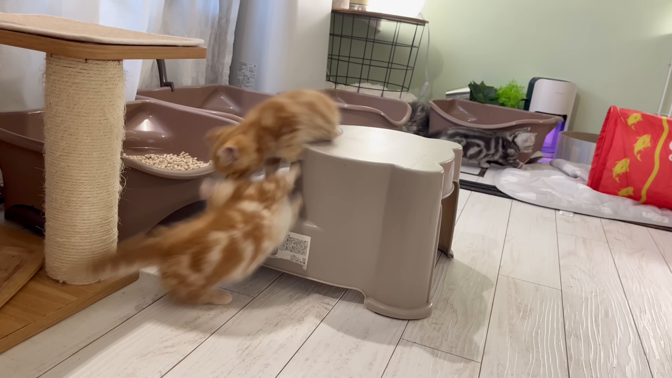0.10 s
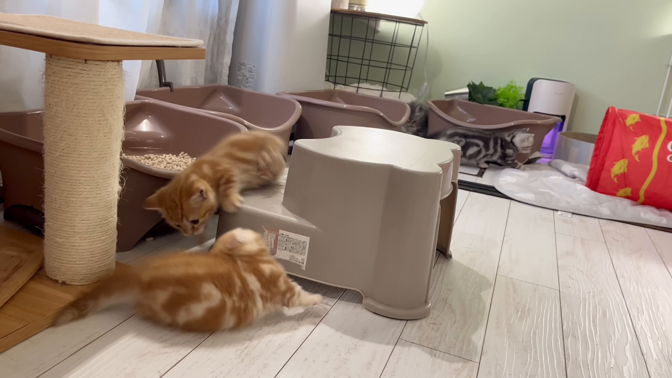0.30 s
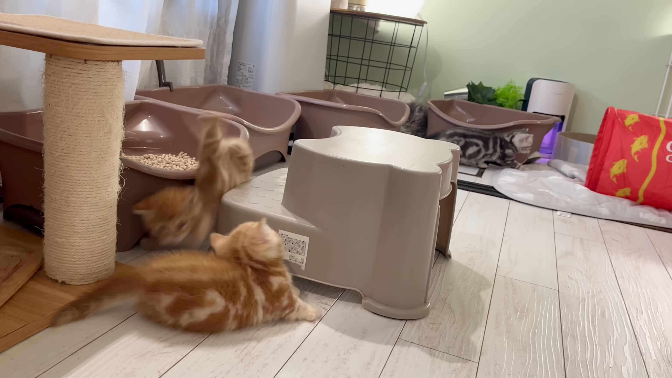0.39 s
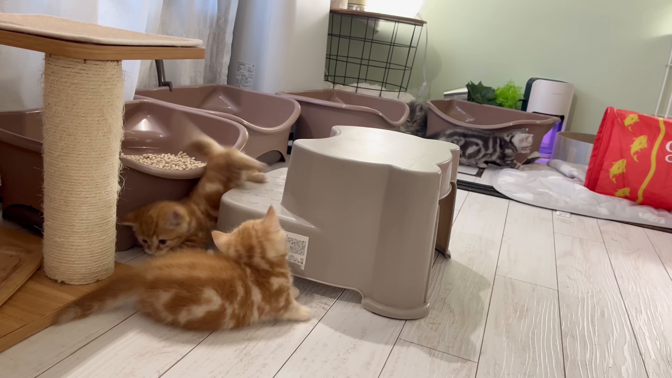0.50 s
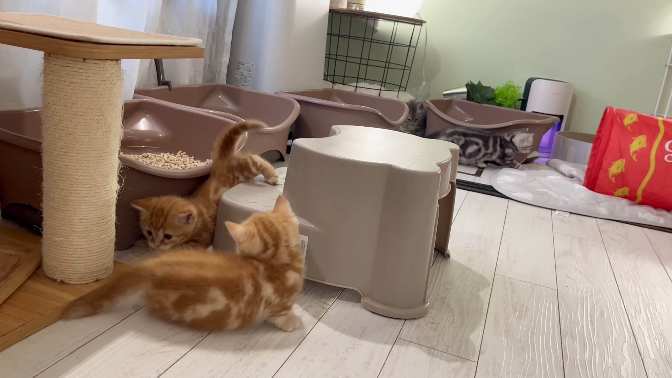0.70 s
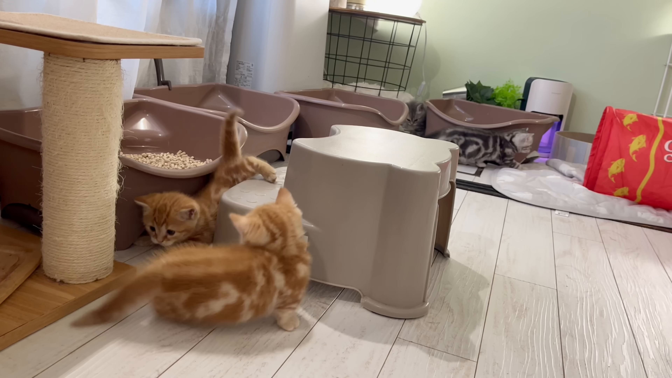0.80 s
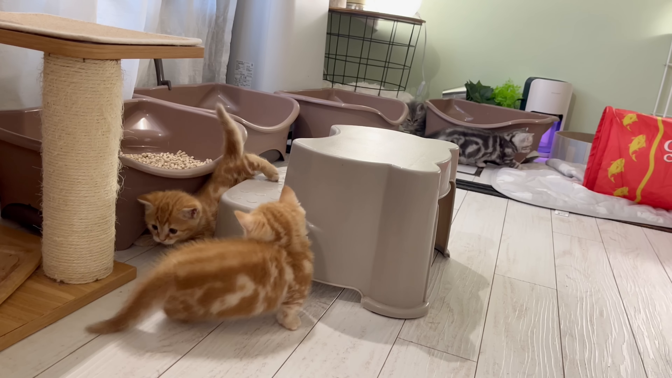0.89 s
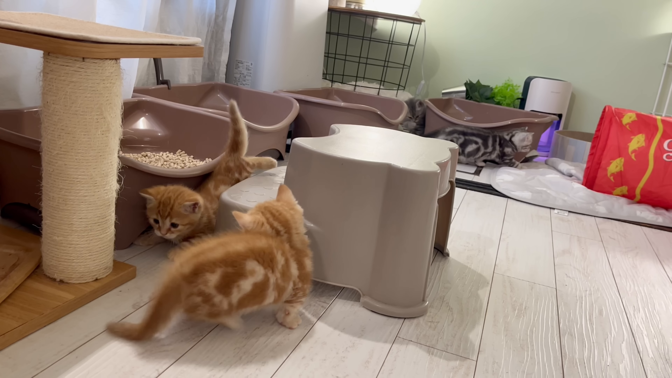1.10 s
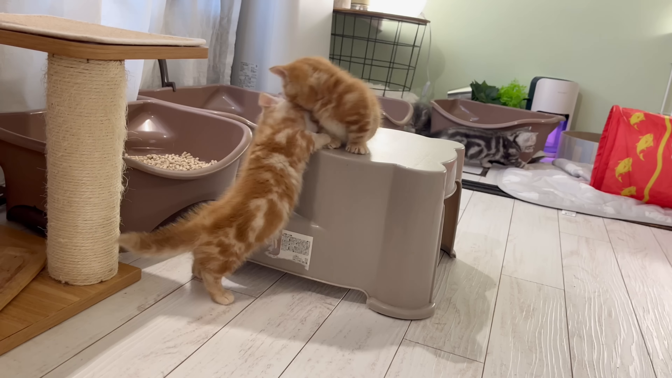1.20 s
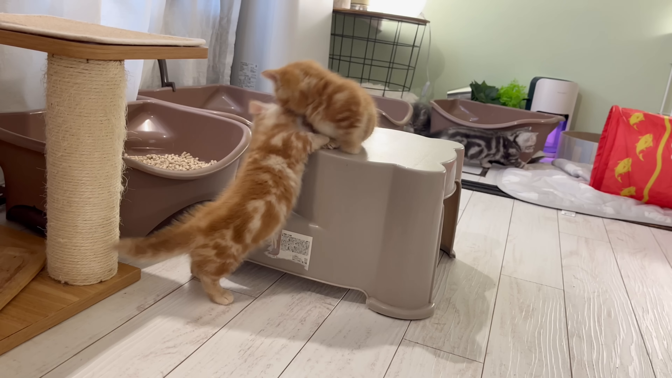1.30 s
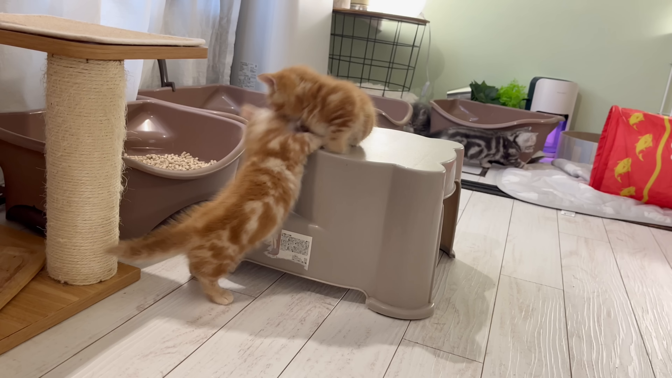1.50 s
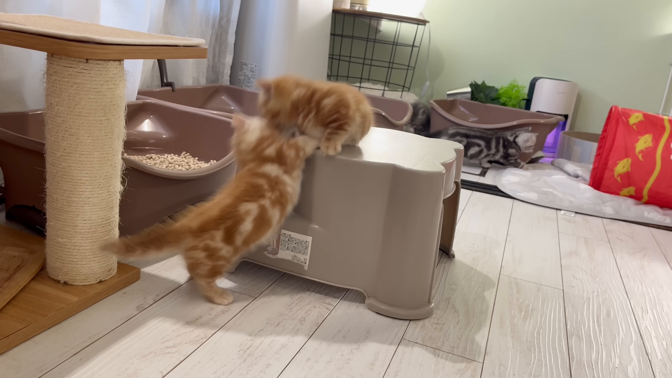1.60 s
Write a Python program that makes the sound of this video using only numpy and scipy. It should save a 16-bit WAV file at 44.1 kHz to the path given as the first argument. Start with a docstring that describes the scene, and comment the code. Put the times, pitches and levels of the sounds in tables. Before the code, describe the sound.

One hard, bright clustered knock on a hollow plastic stool with a brief chatter, soft low paw thuds on the floor, a quiet gap, then faint claw scrabbling; small quiet room, close stereo microphone.

```python
"""A small room with a quiet room tone: kittens tumble off a hollow plastic stool and scrabble back up it.
A sharp cluster of knocks rings the stool's modes and sets it chattering; paws thud on the floor,
whose bending waves bring the highs before the lows. Claws scratch, graze and pluck as bursts of tiny slips
and short resonances; pads tap, scuff and skid; bodies rub, and the pushed stool booms softly."""
import sys
import numpy as np
from scipy import signal
from scipy.fft import rfft, irfft
from scipy.io import wavfile

SR = 44100
rng = np.random.default_rng(int(sys.argv[2]) if len(sys.argv) > 2 else 0)


def put_to_file(sound):
    """Save the sound as 16-bit audio at rate SR, in the file named by the first command-line argument."""
    columns = np.atleast_2d(sound).T  # one column per channel
    safe = np.clip(columns, -1, 1)
    whole_steps = np.round(safe * 32767)
    wavfile.write(sys.argv[1], SR, whole_steps.astype(np.int16))


N = 70560  # samples, 1.6 s

# In every table of sounds or spectra, level_db is relative within its layer.


def amp(db):
    """Decibels to linear gain."""
    return 10 ** (np.asarray(db) / 20)


def unit(x):
    """Scale to an RMS of one."""
    return x / np.sqrt(np.mean(x ** 2))


def clock():
    """Time of every sample, in seconds."""
    return np.arange(N) / SR


def since(start_s):
    """Seconds elapsed since a start, zero before it."""
    return np.maximum(clock() - start_s, 0)


def bins():
    """Frequencies in Hz of a spectrum padded to twice the length."""
    return np.maximum(np.arange(N + 1) * SR / (2 * N), 1)


def curve(points):
    """A table read at every frequency, on a log axis."""
    p = np.array(points, float)
    return np.interp(np.log(bins()), np.log(p[:, 0]), p[:, 1])


def through(x, response):
    """Filter a sound by a frequency response."""
    return irfft(rfft(x, 2 * N) * response)[..., :N]


def colour(points):
    """Causal (minimum-phase) filter with the given dB spectrum."""
    cepstrum = irfft(np.log(amp(curve(points))))
    # fold the negative-time half onto the positive
    cepstrum[1:N] *= 2
    cepstrum[N + 1:] = 0
    return np.exp(rfft(cepstrum))


def decay(t, t60_s):
    """Exponential fall of 60 dB in t60_s."""
    return np.exp(-np.log(1000) * t / t60_s)


def ringing(modes):
    """Frequency response of a set of decaying sine modes."""
    t = clock()
    rings = sum(amp(db) * np.sin(2 * np.pi * hz * t) * decay(t, t60) for hz, db, t60 in modes)
    return rfft(rings, 2 * N)


def impulses(hits):
    """Spectrum of instantaneous blows, each given as start_s, level_db."""
    return sum(amp(db) * np.exp(-2j * np.pi * bins() * start) for start, db in hits)


def rough_noise(corner_hz):
    """Slow random wobble: noise with its highs rolled off, RMS one."""
    return unit(through(rng.standard_normal(N), 1 / (1 + (bins() / corner_hz) ** 2)))


# difference between left and right over their common part: freq_hz, side_over_mid_db
SIDE_OVER_MID = [(60, -15.5), (130, -12), (250, -11), (600, -3.5), (1200, -0.5), (2500, -1.5), (5000, -2),
                 (11000, -9.5)]


def spread():
    """Left and right noise, most alike in the bass: a shared middle plus an opposed side."""
    mid, side = rng.standard_normal((2, N))
    ratio = amp(curve(SIDE_OVER_MID))
    shared = through(mid, 1 / np.hypot(1, ratio))
    opposed = through(side, ratio / np.hypot(1, ratio))
    return shared + np.array([[1], [-1]]) * opposed


# how long the room's echo lasts in each band: freq_hz, t60_s
ROOM_DECAY = [(100, .5), (500, 0.55), (1400, 0.4), (3700, 0.3), (10000, 0.3847)]
# colour of the room's echo: freq_hz, level_db
ECHO_COLOUR = [(100, 5), (500, -1), (2000, 0.5), (5000, 2), (7000, -1), (8500, -17), (11000, -3.5),
               (14000, 0.5)]
ROOM_GAP_S, ROOM_BUILD_S = 0.0018, 0.00075


def room(x, wet_db):
    """The direct sound plus a diffuse noise tail in which each band dies at its own rate."""
    noise, t, tail = spread(), since(ROOM_GAP_S), 0
    for hz, t60 in ROOM_DECAY:
        band = curve([(f, float(f == hz)) for f, _ in ROOM_DECAY])
        tail = tail + through(noise, band) * decay(t, t60)
    tail = tail * (1 - np.exp(-t / ROOM_BUILD_S))
    echo = rfft(unit(tail) / np.sqrt(N), 2 * N)
    return through(x, 1 + amp(wet_db + curve(ECHO_COLOUR)) * echo)


GRAINS_PER_S, GRAIN_SPREAD_DB = 3500, 3


def friction(strokes, response):
    """Dense tiny slips that swell and fade over each stroke and sound through a body."""
    happens = rng.random(N) < GRAINS_PER_S / SR
    size = amp(GRAIN_SPREAD_DB * np.clip(rng.standard_normal(N), -2, 2))
    slips = happens * rng.choice([-1, 1], N) * size
    force = 0
    for start, length, db in strokes:
        progress = np.minimum(since(start) / length, 1)
        force = force + amp(db) * np.abs(np.sin(np.pi * progress)) ** 0.34  # quick edges, broad top
    return through(unit(slips) * force, response / np.sqrt(np.mean(np.abs(response) ** 2)))


# colour of the room tone: freq_hz, level_db
AIR_SPECTRUM = [(20, -7), (40, -22), (75, -2.5), (130, -9.5), (220, -10), (550, -8.5), (800, -12.5),
                (2000, -17.5), (3000, -28.5), (5000, -40.5), (8400, -52.5), (11500, -48.5), (14000, -56)]
AIR_DB = -59


def air():
    """Quiet steady room tone: wide shaped noise."""
    return amp(AIR_DB) * unit(through(spread(), amp(curve(AIR_SPECTRUM))))


# pushes that flex the stool's wall: start_s, length_s, level_db
STOOL_PUSHES = [(.135, 0.072, -47), (0.2432, .034, -25), (.373, 0.036, -42), (1.17, 0.06, -48),
                (1.219, 0.073, -47), (1.289, 0.061, -47.5), (1.323, 0.066, -46.5), (1.403, 0.062, -46.5),
                (1.531, 0.038, -47.5)]
BOOM_HZ, BOOM_EDGE_S = 71.3, 0.0083


def booms():
    """The hollow stool shudders at its lowest mode while a paw drags on it."""
    out = 0
    for start, length, db in STOOL_PUSHES:
        t = since(start)
        swell = np.clip(np.minimum(t, length - t) / BOOM_EDGE_S, 0, 1)
        out = out + amp(db) * swell * -np.sin(2 * np.pi * BOOM_HZ * t)
    return room(out, wet_db=-20)


# bodies rubbing against the hollow stool: start_s, length_s, level_db
BODY_RUBS = [(0.0, 0.035, -55), (.13, 0.058, -57.5), (.45, 0.047, -55.5), (1.18, 0.19, -62),
             (1.40, 0.089, -60), (1.53, 0.065, -59.5)]
# the cavity's rumble: freq_hz, level_db
RUB_SPECTRUM = [(60, -21.5), (130, 1.5), (200, 0), (340, -0.5), (480, -16.5), (900, -40), (2000, -36.5)]


def rubs():
    """Fur and paws rub on the stool and make its cavity rumble."""
    return room(friction(BODY_RUBS, colour(RUB_SPECTRUM)), wet_db=-0.5)


# pads scuffing along: start_s, length_s, level_db
PAD_SCUFFS = [(0.0, 0.0083, -52), (.453, 0.0074, -50), (.464, 0.045, -52), (.545, 0.034, -58),
              (1.23, 1, -63.5)]
# their dull rub: freq_hz, level_db
SCUFF_SPECTRUM = [(300, -1), (900, 0), (1400, 2), (2200, 0.5), (3000, -5), (5000, -10), (7000, -20),
                  (8500, -20), (12000, -25.5), (15000, -44)]


def scuffs():
    """Pads slide with a duller rub than the claws."""
    return room(friction(PAD_SCUFFS, colour(SCUFF_SPECTRUM)), wet_db=-0.5)


# pads slipping off the plastic: start_s, level_db
PAD_SKIDS = [(1.202, -63.5), (1.299, -64), (1.379, -57), (1.459, -57.5), (1.569, -58)]
SKID_S, SKID_START_HZ, SKID_END_HZ, SKID_ROUGH_HZ = 0.01985, 1150, 2365, 740


def skids():
    """A slipping pad gathers speed, so its rough chirr rises."""
    out = 0
    for start, db in PAD_SKIDS:
        progress = np.minimum(since(start) / SKID_S, 1)
        hz = SKID_START_HZ + (SKID_END_HZ - SKID_START_HZ) * progress
        chirr = np.sin(2 * np.pi * np.cumsum(hz) / SR)
        out = out + amp(db) * np.sin(np.pi * progress) * chirr
    return room(2 * rough_noise(SKID_ROUGH_HZ) * out, wet_db=-7.5)


# light hollow taps: start_s, pitch_hz, level_db, rise_s (the peak comes after twice rise_s)
PAD_TAPS = [(0.2075, 313, -36.5, 0.0022), (.207, 614, -39.5, .001), (.229, 661, -34.5, 0.0015),
            (0.2285, 404, -23.5, 0.0015), (.23, 927, -46, 0.0016), (.246, 344, -38, 0.0011),
            (.2545, 877, -43.5, 0.0018), (.3415, 736, -41.5, 0.00082), (.429, 720, -43, 0.00096),
            (.4555, 782, -38, 0.00095), (.641, 510, -45, 0.00083), (1.242, 325, -44.5, 0.0014),
            (1.279, 725, -48.5, 0.0015), (1.377, 748, -43.5, .0012), (1.420, 318, -48.5, 0.0023),
            (1.458, 754, -46, 0.0015), (1.568, 750, -47, 0.0013)]
TAP_UPPER_RATIO, TAP_UPPER_DB = 1.549, -13.5  # a second partial above the pitch
TAP_ROUGH_DEPTH, TAP_ROUGH_HZ = .22, 250


def taps():
    """Soft contacts that ring for only a few cycles, roughened as the pad rolls."""
    rough = 1 + TAP_ROUGH_DEPTH * rough_noise(TAP_ROUGH_HZ)
    out = 0
    for start, hz, db, rise in PAD_TAPS:
        t = since(start)
        upper = amp(TAP_UPPER_DB) * np.sin(2 * np.pi * hz * TAP_UPPER_RATIO * t)
        tone = np.sin(2 * np.pi * hz * t) + upper
        swell = (t / rise / 2) ** 2 * np.exp(2 - t / rise)  # peaks at one
        out = out + amp(db) * tone * swell
    return room(rough * out, wet_db=-7.5)


# claw tips grazing with a fine hiss: start_s, length_s, level_db
CLAW_GRAZES = [(.125, 0.0057, -58.5), (.135, 0.04, -64), (.166, 0.012, -54.5), (.4275, 0.0054, -63),
               (.452, 0.0069, -55.5), (1.208, 0.011, -55.5), (1.306, 0.016, -56)]
# that hiss: freq_hz, level_db
GRAZE_SPECTRUM = [(1000, -41), (3000, 8), (4400, 2), (7000, -2.5), (8500, 2.5), (10500, -4), (13000, -14),
                  (15000, -14)]


def grazes():
    """The very tips of the claws brush the surface."""
    return room(friction(CLAW_GRAZES, colour(GRAZE_SPECTRUM)), wet_db=2.5)


# claw strokes on the stool: start_s, length_s, level_db
CLAW_SCRATCHES = [(0.0, 0.044, -67.5), (.157, 0.0198, -53.5), (1.2055, 0.011, -49.5), (1.222, 0.032, -59.5),
                  (1.3035, 0.0117, -49), (1.32, 0.1, -69.5), (1.405, 0.037, -58), (1.525, 0.0221, -57)]
# scrape of claw on plastic: freq_hz, level_db
CLAW_SPECTRUM = [(500, -20.5), (1500, -0.5), (2300, -9.5), (2800, -1.5), (4200, 5), (5200, -6), (7200, -7),
                 (10500, -7.5), (15000, -50)]
# resonances that a claw excites, in scratches and picks: pitch_hz, level_db, t60_s
CLAW_MODES = [(1462, -2.5, 0.0236), (2683, 2, .02), (3132, -1.5, 0.043), (3810, 0, 0.013),
              (4600, -4.5, 0.022), (5070, 1, 0.018), (6510, 0.5, 0.013), (7130, 4.5, 0.016)]
CLAW_RING_DB, CLAW_ROOM_DB = -29, -1.5


def scratches():
    """Claws skid over the plastic: scraping slips that excite short resonances."""
    body = colour(CLAW_SPECTRUM) * (1 + amp(CLAW_RING_DB) * ringing(CLAW_MODES))
    return room(friction(CLAW_SCRATCHES, body), CLAW_ROOM_DB)


# claws snapping free: start_s, level_db
CLAW_PICKS = [(1.211, -54.5), (1.309, -54.5)]


def picks():
    """A claw snaps free during a scratch and plucks the plastic."""
    plucked = irfft(impulses(CLAW_PICKS) * ringing(CLAW_MODES))[:N]
    return room(plucked, CLAW_ROOM_DB)


# the stool chattering after the knocks: start_s, length_s, level_db
STOOL_RATTLES = [(.231, 0.029, -46.5), (.26, 0.036, -54)]
# that chatter: freq_hz, level_db
RATTLE_SPECTRUM = [(500, -14), (1500, -18), (2000, -1), (4200, -0.5), (4750, 3), (5500, -13), (7000, -19),
                   (8500, -14), (11000, -29), (15000, -38)]


def rattles():
    """The jolted stool chatters in a dense run of tiny contacts."""
    return room(friction(STOOL_RATTLES, colour(RATTLE_SPECTRUM)), wet_db=-8)


# paws landing: start_s (when the 1000 Hz part arrives), level_db, brightness_corner_hz,
# travel_s (of the 100 Hz bending wave)
PAW_THUDS = [(0.0274, -18, 302, 0.021), (0.066, -26, 131, 0.017), (0.106, -31, 152, 0.0185),
             (0.2262, -6.5, 228, 0.028), (0.266, -9.5, 172, 0.0238), (0.292, -14, 131, 0.03023),
             (0.3027, -13, 117, 0.03015), (0.359, -30, 104, 0.0242), (0.4321, -17.5, 230, 0.0203),
             (0.452, -17.5, 205, 0.01202), (.466, -19.5, 171, 0.01175), (0.48, -18, 190, 0.01386),
             (0.502, -15, 90, .026), (0.54, -21, 179, 0.014), (0.669, -31.5, 89.6, .025),
             (0.789, -33, 101, .025), (1.493, -18, 300, 0.02096)]
# weight of a landing: freq_hz, level_db
THUD_SPECTRUM = [(25, -16.5), (45, -6), (68, 3.5), (100, 0.5), (160, -6.5), (260, -2), (400, -7),
                 (700, -18), (1500, -12)]
# low modes of floor and room: pitch_hz, level_db, t60_s
FLOOR_MODES = [(61.8, -1.5, 0.27), (100, -9.5, 0.31), (133, -19, 0.13), (166, -20, 0.63), (180.1, 2, 0.61),
               (251, -6.5, 0.44), (351, -4, 0.35)]
THUD_DB, FLOOR_RING_DB, BEND_FRONT_HZ = 28.5, -64, 1000


def thuds():
    """Each landing sends a bending wave through the floor, highs ahead of lows, and leaves a low ring."""
    f = bins()
    # bending-wave delay goes as 1/sqrt(f); this is its integral, counted from the front frequency
    dispersion = 10 * (2 * np.sqrt(f) - f / np.sqrt(BEND_FRONT_HZ))
    waves = 0
    for start, db, corner_hz, travel in PAW_THUDS:
        arrival = np.exp(-2j * np.pi * (f * start + travel * dispersion))
        waves = waves + amp(db) * arrival / np.sqrt(1 + (f / corner_hz) ** 6)
    wave = irfft(waves * amp(THUD_DB + curve(THUD_SPECTRUM)))[:N]
    return room(through(wave, 1 + amp(FLOOR_RING_DB) * ringing(FLOOR_MODES)), wet_db=-13)


# hard contacts with the plastic: start_s, level_db
STOOL_KNOCKS = [(0.174, -19), (0.225, -2), (0.2253, -4.5), (0.228, 1.5), (0.2334, -3.5), (.238, -9.5),
                (0.25, -22), (0.546, -26)]
# the crack of contact: freq_hz, level_db
KNOCK_SPECTRUM = [(200, -20), (900, -9.5), (1500, -7), (2200, 7), (3200, -2), (4150, -7), (4800, -1),
                  (5400, -8.5), (6800, -10), (8400, -8.5), (10800, -15.5), (13500, -25), (15500, -28)]
# modes of the stool's shell: pitch_hz, level_db, t60_s
STOOL_MODES = [(1063, -6.5, .35), (1251, 6, 0.21), (1427, -6.5, 0.31), (1750, -2, 0.29),
               (1959.5, 0.5, 0.32), (2040, 0.5, 0.27), (2223, -2, 0.112), (2400, -5, 0.19), (2630, 1, 0.11),
               (2752, 9, 0.17), (3106, -15, .2), (4727, -7, 0.15), (4830, -2, .17)]
KNOCK_DB, CRACK_S, STOOL_RING_DB = -13.5, 0.0013, -54  # CRACK_S is the decay constant


def knocks():
    """Each hard contact is a brief noisy crack, and its blow rings the stool's shell."""
    force = 0
    for start, db in STOOL_KNOCKS:
        force = force + amp(db) * (clock() >= start) * np.exp(-since(start) / CRACK_S)
    noise = rng.choice([-.5, .5], N)
    cracks = through(amp(KNOCK_DB) * force * noise, colour(KNOCK_SPECTRUM))
    shell = amp(STOOL_RING_DB) * irfft(impulses(STOOL_KNOCKS) * ringing(STOOL_MODES))[:N]
    return room(cracks, wet_db=-2.5) + room(shell, wet_db=-4.5)


def scene():
    """All the layers, from the background to the knocks."""
    background = air() + booms() + rubs()
    pads = scuffs() + skids() + taps()
    claws = grazes() + scratches() + picks()
    return background + pads + claws + rattles() + thuds() + knocks()


# level of left over right: freq_hz, level_db
LEFT_OVER_RIGHT = [(60, 2), (500, 0.9), (1300, 0.9), (2200, 3), (4200, 10), (6300, 4.5), (8500, -1),
                   (14000, 1)]
# phase by which left leads right (negative lags): freq_hz, lead_rad
LEFT_LEAD = [(100, 0), (1200, 0), (2200, .55), (4200, .55), (5600, -.8), (6600, -.9), (7800, -2.4),
             (9400, -3.6), (10400, -5.4), (13500, -7.2)]
TOP_HZ = 14400


def record(dry):
    """Two microphone ports differ in level and phase, half the difference on each; the top is cut."""
    half = amp(curve(LEFT_OVER_RIGHT) / 2) * np.exp(.5j * curve(LEFT_LEAD))
    stereo = through(dry, np.array([half, 1 / half]))
    top_cut = signal.ellip(8, .2, 70, TOP_HZ, fs=SR, output="sos")
    return signal.sosfilt(top_cut, stereo)


dry = scene()
out = record(dry)
put_to_file(out)
```